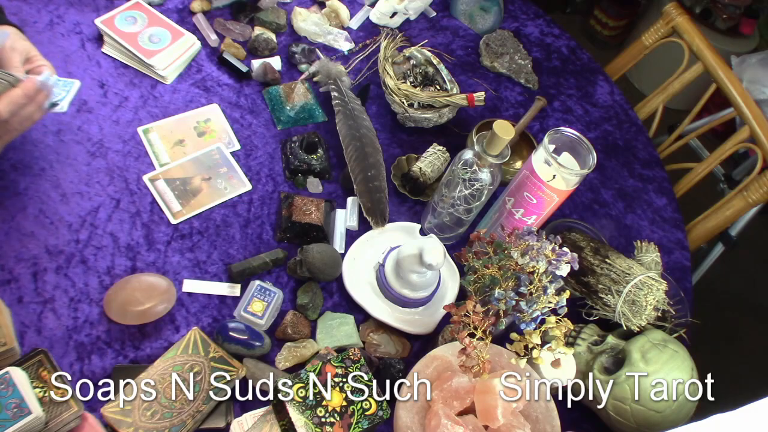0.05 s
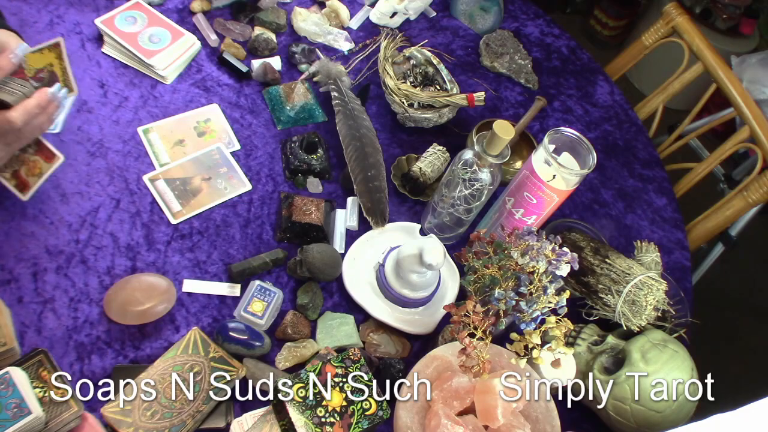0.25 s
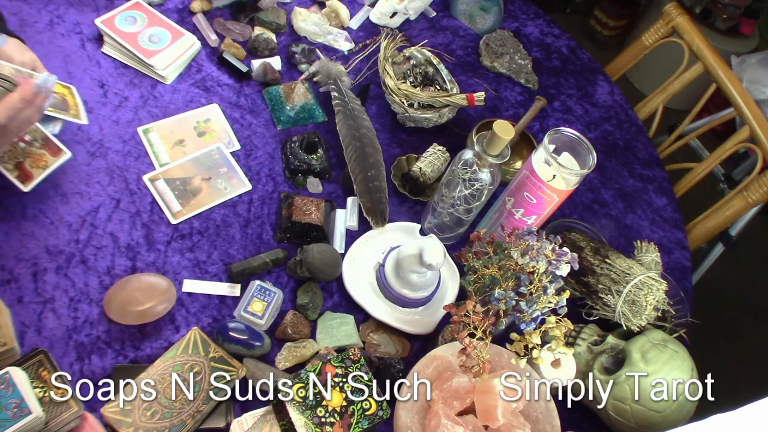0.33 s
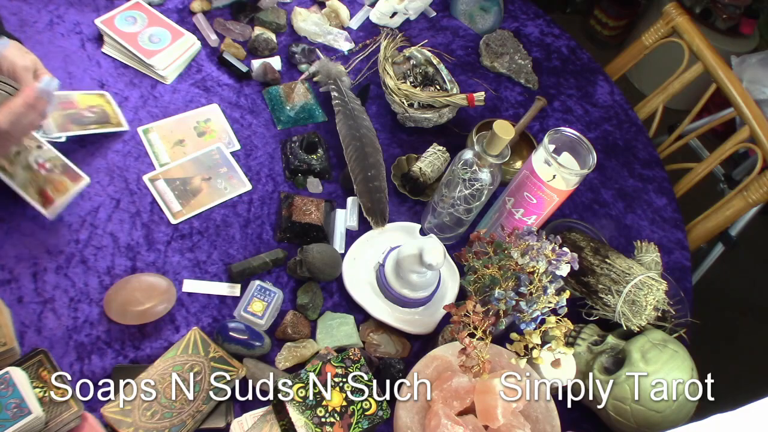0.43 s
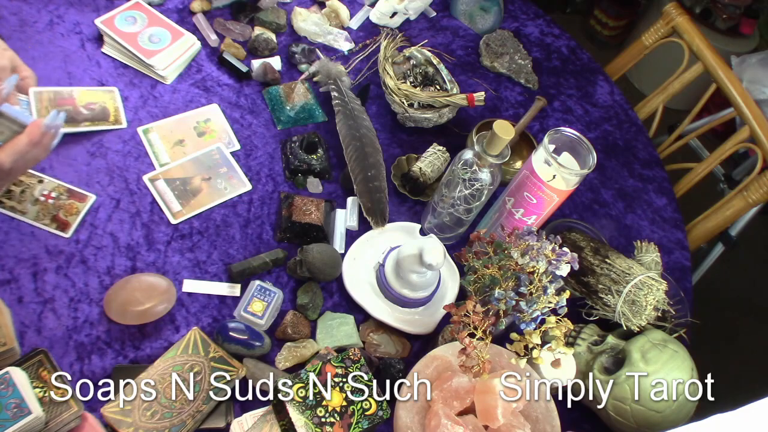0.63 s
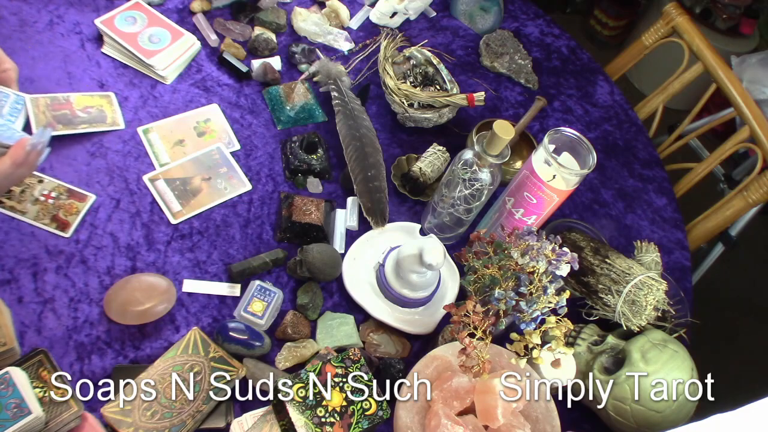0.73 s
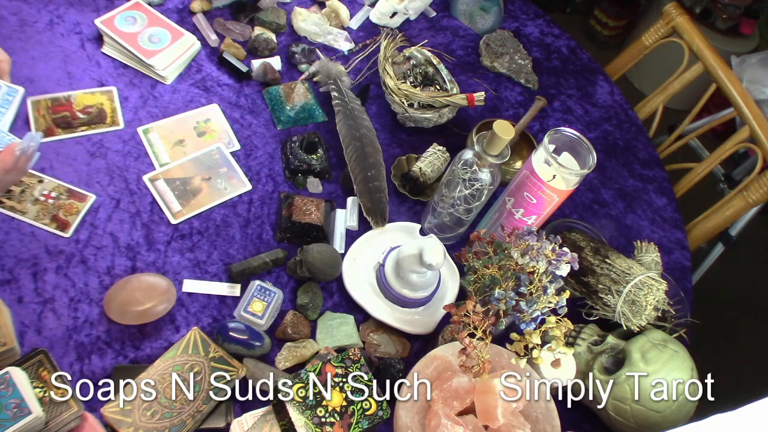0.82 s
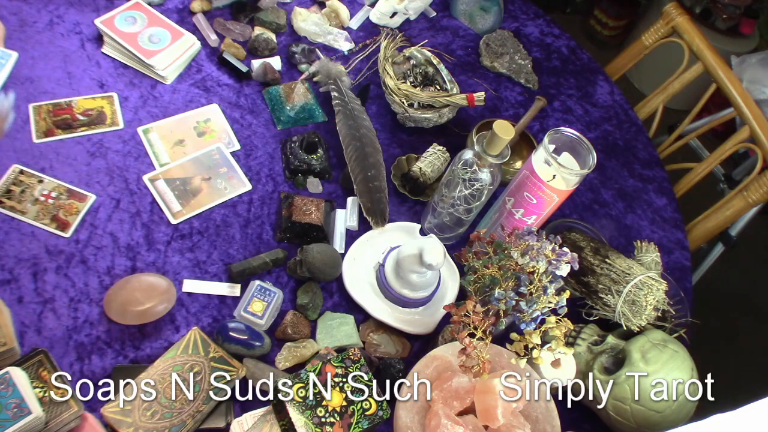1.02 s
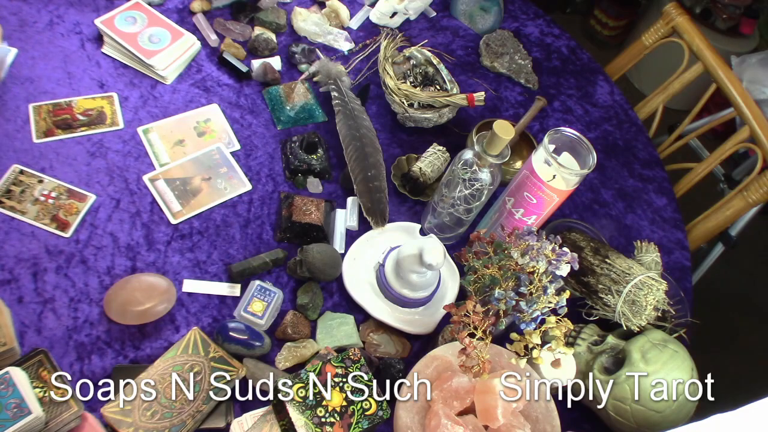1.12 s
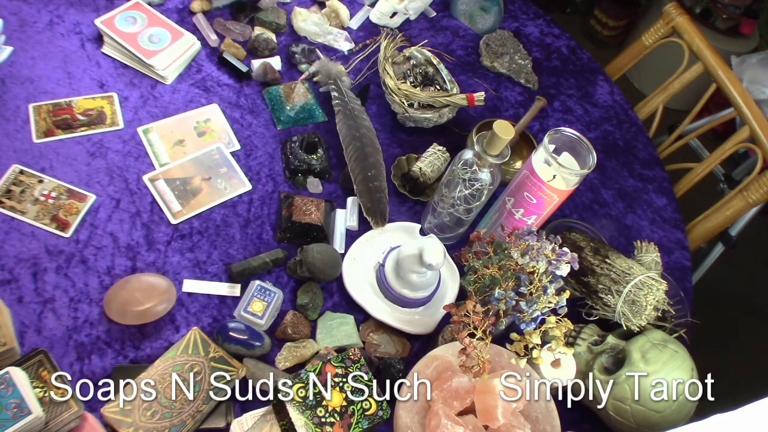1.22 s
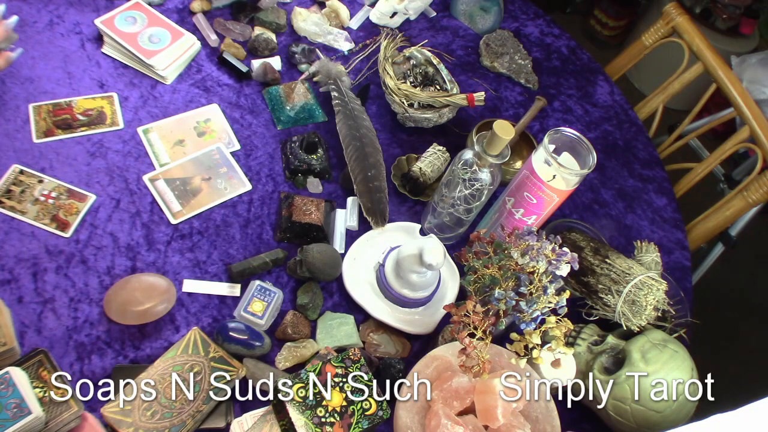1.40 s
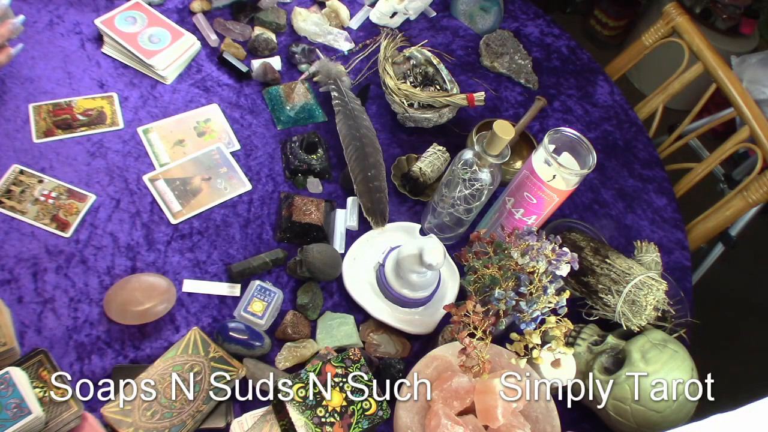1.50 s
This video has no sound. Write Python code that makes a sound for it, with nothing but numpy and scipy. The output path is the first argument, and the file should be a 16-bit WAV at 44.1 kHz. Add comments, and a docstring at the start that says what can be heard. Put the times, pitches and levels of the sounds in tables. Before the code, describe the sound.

Stiff cards slide, snap and tick as they are dealt onto a cloth-covered table.

```python
"""A brief papery slide, then ticks: stiff cards are pulled from a hand-held deck in a small room.
Friction makes each card hiss, and impacts on its neighbours and the fingers make it tick; cards and
cupped hand resonate. One card bends, snaps free with a loud flutter and rasps along the deck.
Hands and cards thump softly on a cloth-covered table, and after a pause the cards rustle again."""
import sys
import numpy as np
from scipy import signal
from scipy.fft import rfft, irfft
from scipy.io import wavfile
from scipy.ndimage import uniform_filter1d

SR = 44100
rng = np.random.default_rng(int(sys.argv[2]) if len(sys.argv) > 2 else 0)


def inscribe(sig):
    """Save sig as 16-bit PCM at rate SR to the path in sys.argv[1].

    A 1-D sig is mono; a 2-D sig holds one channel per row.
    Samples are clipped to [-1, 1] before scaling.
    """
    pcm = np.round(np.clip(np.atleast_2d(sig).T, -1, 1) * 32767)
    wavfile.write(sys.argv[1], SR, pcm.astype(np.int16))


N = 68355
T = np.arange(N) / SR
SHORT = 4096  # samples in one impact or filter response


def amp(db):
    """Amplitude ratio of a level in decibels."""
    return 10 ** (np.asarray(db) / 20)


def unit_rms(x):
    """Normalisation to an rms of one."""
    return x / np.sqrt(np.mean(x ** 2))


def unit_energy(x):
    """Normalisation to an energy of one."""
    return x / np.sqrt(np.sum(x ** 2))


def bins(x):
    """Fourier frequencies of a signal zero-padded to twice its length."""
    return np.maximum(np.fft.rfftfreq(2 * len(x), 1 / SR), 1)


def on_log_axis(points, hz):
    """Linear interpolation of (f/Hz, value) points over log frequency."""
    f, v = np.array(points, float).T
    return np.interp(np.log(hz), np.log(f), v)


def delay(x, s):
    """Time shift by s seconds, padded or cut to the scene's length."""
    return np.pad(x, (max(int(s * SR), 0), max(N - len(x), 0)))[:N]


def jitter(step_s):
    """Random modulation: Gaussian values every step_s, joined by lines."""
    return np.interp(T / step_s, np.arange(N), rng.standard_normal(N))


def colour(x, points, extra_db=lambda hz: 0):
    """Minimum-phase filtering through (f/Hz, gain/dB) points, plus an optional gain curve."""
    hz = bins(T[:SHORT])
    cepstrum = irfft(np.log(amp(on_log_axis(points, hz) + extra_db(hz))))
    cepstrum[1:SHORT] *= 2  # folding the cepstrum makes the filter causal
    cepstrum[SHORT + 1:] = 0
    response = irfft(np.exp(rfft(cepstrum)))[:SHORT]
    return signal.fftconvolve(x, response)[:len(x)]


def whiten(x, width_hz):
    """Spectral whitening: each component is divided by the rms of the band around it."""
    spectrum = rfft(x)
    power = uniform_filter1d(np.abs(spectrum) ** 2, size=int(width_hz * len(x) / SR) | 1)
    return irfft(spectrum / np.sqrt(np.abs(power) + 1e-18), len(x))


def burst(envelope, width_hz):
    """Broadband transient: enveloped noise, whitened and confined in time by turns."""
    x = rng.standard_normal(len(envelope)) * envelope
    gate = np.minimum(10 * envelope / envelope.max(), 1)
    for _ in range(2):
        x = whiten(x, width_hz) * gate
    return unit_energy(x)


def resonate(x, modes, direct_db):
    """Modal superposition: damped resonators ring in parallel with a direct path."""
    hz = bins(T[:SHORT])
    ringing = sum(amp(db) / (1 + 1j * (hz ** 2 - f ** 2) / (hz * width)) for f, width, db in modes)
    return signal.fftconvolve(x, irfft(amp(direct_db) + ringing)[:SHORT])[:len(x)]


def air():
    """Stationary noise: the quiet background of the room."""
    # noise spectrum: f/Hz, relative density level/dB
    spectrum = [(15, -53), (25, -25.5), (59, -20), (166, -5.5), (229, -6), (293, -2.5), (394, -3),
                (427, -3.5), (695, -4.5), (796, -3.5), (1190, -10), (6380, -22.5), (11300, -31),
                (14400, -41), (16000, -55)]
    return unit_rms(colour(rng.standard_normal(N), spectrum)) * amp(-58)


def room(x):
    """Reverberation: early reflections, a short tail whose treble dies first and a faint long one."""
    # reverberation time of the short tail: f/Hz, T60/s
    decay_times = [(200, 0.2), (700, .27), (2000, 0.17), (5000, 0.18), (14000, 0.12)]
    # colour of the reflected sound: f/Hz, gain/dB
    spectrum = [(150, 4.5), (380, -4), (700, -1), (1150, -4.5), (1800, -2), (5000, -2), (14000, -4.5)]
    predelay_s, early_fall_s, late_t60_s = .0055, .012, 1.0
    t = T[:2 ** 15]
    noise, tail = rfft(rng.standard_normal(len(t)), 2 * len(t)), 0
    for hz, t60 in decay_times:
        band = on_log_axis([(f, f == hz) for f, _ in decay_times], bins(t))
        tail += irfft(noise * band)[:len(t)] * amp(-60 * t / t60)
    early = burst(np.exp(-t / early_fall_s) * amp(4.6 * jitter(.0005)[:len(t)]), width_hz=78)
    late = unit_energy(rng.standard_normal(len(t)) * amp(-60 * t / late_t60_s))
    response = amp(-3) * early + amp(-9.5) * unit_energy(tail) + amp(-31.5) * late
    white = whiten(np.pad(response, (0, len(t))), width_hz=200)[:len(t)]
    response = colour(unit_energy(white) * np.linalg.norm(response), spectrum)
    return x + delay(signal.fftconvolve(x, response), predelay_s)


def thumps():
    """Damped oscillation: the cloth-covered table answers each soft touch with one low note."""
    # touches of hands and cards: t/s, f/Hz, level/dB
    touches = [(.205, 230, -42), (0.274, 189, -44.5), (.323, 85, -64), (0.583, 130, -64),
               (0.741, 100.5, -50.5), (0.937, 115, -58.5)]
    rise_s, fall_s = .0054, .022
    envelope = (1 - np.exp(-T / rise_s)) * np.exp(-T / fall_s)
    return sum(amp(db) * delay(np.sin(2 * np.pi * hz * T) * envelope, s) for s, hz, db in touches)


def friction(spectrum, grain_db=1, grain_s=.00067):
    """Friction noise: a coloured hiss made grainy by rapid random changes of level."""
    grains = rng.standard_normal(N) * amp(grain_db * jitter(grain_s))
    return unit_rms(colour(grains, spectrum))


def swell(peak_s, rise_s, fall_s):
    """Exponential growth to a peak, then exponential decay."""
    return np.exp(-np.maximum((peak_s - T) / rise_s, (T - peak_s) / fall_s))


def slides():
    """Sliding friction swells and dies as one card rubs over another."""
    # strokes: peak t/s, rise/s, fall/s, level/dB
    strokes = [(.003, 0.022, 0.011, -36.5), (.168, 0.054, 0.023, -49), (0.194, 0.0088, .008, -38),
               (0.396, 0.041, 0.0067, -37), (0.75, 0.022, .01, -57), (1.384, 0.021, 0.0097, -52),
               (1.485, 0.038, .012, -46), (1.512, 0.0087, 0.015, -49.5)]
    # spectrum of card rubbing on card: f/Hz, relative level/dB
    spectrum = [(88, -42), (150, -42), (348, -9), (675, -6), (1210, -2.5), (2180, -7.5), (2400, -9),
                (3420, -2.5), (8070, -9.5), (16000, -30.5)]
    envelope = sum(amp(db) * swell(s, rise, fall) for s, rise, fall, db in strokes)
    return envelope * friction(spectrum)


def rasp():
    """Friction of the freed card's edge along the deck excites one broad papery resonance."""
    # spectrum of the scraping edge: f/Hz, relative level/dB
    spectrum = [(300, -38), (1200, -13.5), (1700, 4), (2100, -13.5), (3000, -12), (12000, -45)]
    return amp(-35) * swell(peak_s=.392, rise_s=.039, fall_s=.011) * friction(spectrum)


def ticks():
    """Impact excitation: a sharp contact and milliseconds of flutter, each with its own tone and ring."""
    # contacts: t/s, rise/s, fall/s, ring f/Hz, ring lift/dB, then level/dB in each of four bands
    contacts = [(0.0777, 0.00043, 0.0084, 1680, 2, -55, -45.5, -54, -44),
                (.0840, 0.0025, 0.0032, 1680, 6, -41, -40, -35, -38.5),
                (0.1973, 0.0017, .002, 2390, 2, -35.5, -36.5, -22, -32.5),
                (0.2048, .001, 0.014, 430, 3, -29.5, -32, -42, -35.5),
                (0.2649, 0.0007, 0.0045, 770, 12.5, -38.5, -41.5, -42, -40),
                (0.2795, 0.00096, 0.0044, 820, 7.5, -30.5, -34, -56, -57),
                (0.2947, .002, 0.0095, 785, 5, -31, -39, -35.5, -43),
                (.3390, 0.0023, 0.0072, 2030, 17, -29.5, -26, -22, -37),
                (0.3502, 0.0007, .004, 2030, 7.5, -43, -26, -20.5, -26),
                (.4350, 0.00054, .003, 3420, 13, -41, -47.5, -38, -35.5),
                (0.503, 0.00014, 0.0037, 3050, 2, -70, -57, -40, -44.5),
                (0.5168, 0.00097, 0.0047, 1150, 3, -42, -32, -43.5, -41),
                (0.5446, 0.00013, 0.0027, 5960, 5.5, -40, -33, -30, -29.5),
                (0.5766, 0.0015, 0.012, 600, 14.5, -42, -32.5, -74, -71),
                (0.5835, 0.00012, 0.0017, 2960, -3, -37, -37, -26, -30.5),
                (0.5894, 0.00095, 0.0051, 790, 1, -33, -29.5, -54, -68),
                (.7540, 0.0024, 0.0015, 2900, 8, -55.5, -48, -43.5, -47),
                (.7845, 0.00082, 0.004, 2400, 10, -67, -58, -61, -56),
                (1.3835, 0.0014, 0.0027, 3300, 13.5, -69.5, -62, -61, -57),
                (1.436, 0.0013, 0.0075, 1220, 0, -49.5, -46, -45, -45.5),
                (1.4457, .004, 0.0042, 2860, 4, -65, -47.5, -43, -48.5),
                (1.4850, 0.003, 0.0071, 1220, 7, -56.5, -48, -43.5, -40.5)]
    # bands of knock, body, snap and edge: f/Hz
    band_hz = (400, 1050, 3000, 7000)
    ring_octaves, crack_limit_s, reference_s = .14, .001, .005
    out, t = np.zeros(N), T[:SHORT]
    for s, rise_s, fall_s, ring_hz, lift_db, *levels in contacts:
        envelope = np.minimum((t + 1 / SR) / rise_s, 1) * np.exp(-np.maximum(t - rise_s, 0) / fall_s)
        hit = burst(envelope, width_hz=130)
        hit[0] += .35 * np.exp(-rise_s / crack_limit_s)  # only a fast rise keeps its crack
        density_db = np.array(levels) + 10 * np.log10(SR / 2 / np.array(band_hz))
        tone = [(100, density_db[0] - 26.5), *zip(band_hz, density_db), (15000, density_db[-1] - 17.5)]
        ring = lambda hz: lift_db / (1 + (np.log2(hz / ring_hz) / ring_octaves) ** 2)
        out += delay(colour(unit_energy(hit), tone, ring), s)
    return out * np.sqrt(reference_s * SR)  # levels refer to the energy spread over reference_s


def snap(release_s):
    """Elastic release: the bent card slips free, flaps against the deck and rings as it straightens."""
    # spectrum of the flutter: f/Hz, relative level/dB
    spectrum = [(50, -33.5), (180, -28.5), (280, -13.5), (400, 0), (650, -5.5), (1100, 0), (1650, -2.5),
                (2500, -0.5), (3400, -5), (4400, -8.5), (5600, -7.5), (6800, -15.5), (11800, -24.5),
                (16000, -43)]
    # modes of the bent card: f/Hz, bandwidth/Hz, gain/dB
    modes = [(390.5, 55, 2), (549, 54, -8.5), (876, 63, 3.5), (1172, 160, 0), (1680, 44, -16),
             (2030, 42, -7), (2947, 87, -1.5), (3277, 60, 2.5)]
    rise_s, hold_s, fall_s = .0038, .0045, .004
    flap_hz, flap_depth = 522.6, .8
    t = T[:SHORT]
    envelope = np.minimum((t + 1 / SR) / rise_s, 1) * np.exp(-np.maximum(t - rise_s - hold_s, 0) / fall_s)
    phase = np.cumsum(flap_hz * (1 + .21 * jitter(.002)[:SHORT])) / SR % 1
    flaps = 1 - flap_depth * np.sqrt(phase)
    flutter = colour(burst(envelope * flaps, width_hz=90), spectrum)
    ringing = unit_energy(resonate(flutter, modes, direct_db=-5))
    return delay(ringing, release_s) * np.linalg.norm(envelope) * amp(-11)


def scene():
    """Superposition: each kind of card sound has its own echoes; thumps and room noise add dry."""
    # modes of the cards and the cupped hand: f/Hz, bandwidth/Hz, gain/dB
    hand_modes = [(322, 53, -5.5), (430, 54, 0), (566, 50, -6), (832, 80, 3), (1220, 105, 2.5),
                  (1609, 110, -0.5), (2446, 170, 0), (2906, 120, -1.5), (3430, 240, -5), (5540, 480, -9),
                  (6770, 450, -12.5)]
    release_s = .3215
    handled = [resonate(x, hand_modes, direct_db=-6.5) for x in (ticks(), slides())]
    bent_card = snap(release_s) + rasp() * (T > release_s)
    cards = sum(room(x) for x in (*handled, bent_card))
    bass_cut = signal.butter(2, 55, "high", fs=SR, output="sos")  # small cards radiate little bass
    return (signal.sosfilt(bass_cut, cards) + thumps() + air())[None]


def record(dry):
    """Soft saturation rounds the loudest peaks; a steep low-pass removes the highest treble."""
    low_pass = signal.ellip(8, .2, 70, 15600, fs=SR, output="sos")
    return signal.sosfilt(low_pass, np.tanh(dry))


dry = scene()
out = record(dry)
inscribe(out)
```